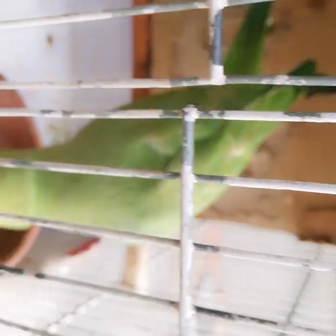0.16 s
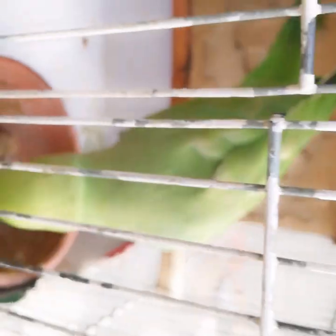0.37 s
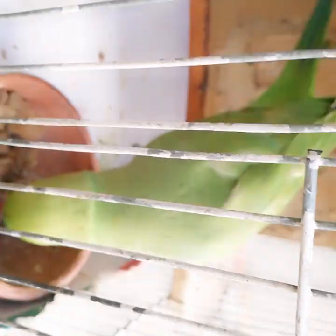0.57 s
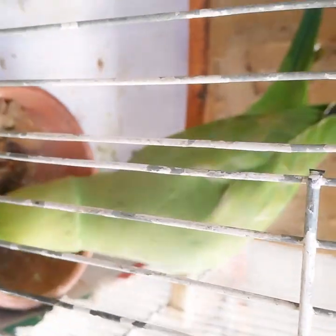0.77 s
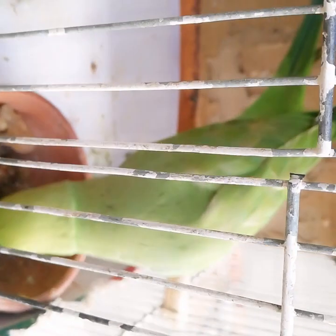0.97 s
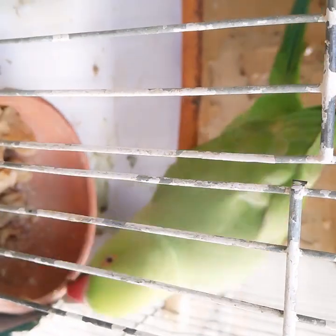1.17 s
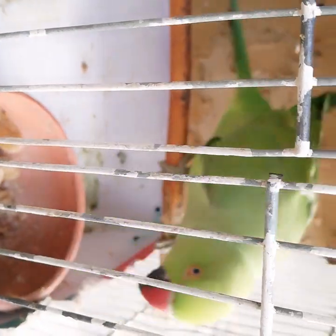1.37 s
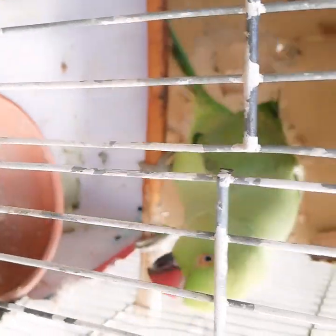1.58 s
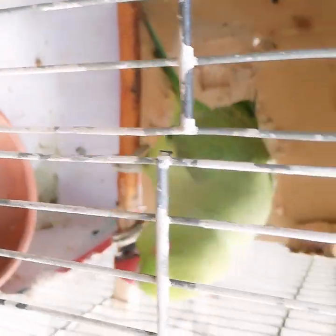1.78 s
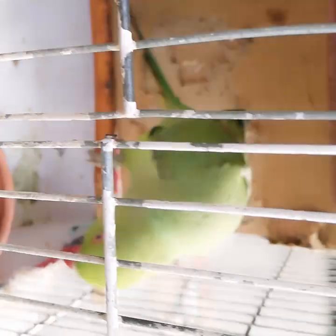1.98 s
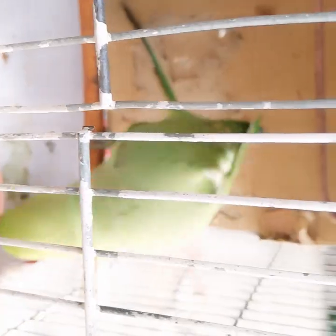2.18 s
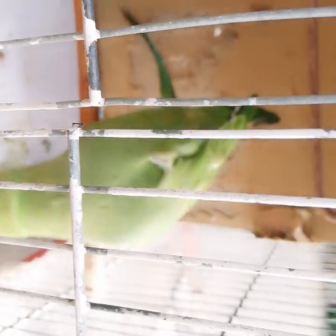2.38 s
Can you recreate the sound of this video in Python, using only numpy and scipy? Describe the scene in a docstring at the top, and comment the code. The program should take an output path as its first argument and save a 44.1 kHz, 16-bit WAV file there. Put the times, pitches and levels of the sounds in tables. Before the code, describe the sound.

Close to the microphone in a small room, a parrot gives two loud, hoarse squawks and a shorter, lower one, with a whistle dipping and rising. Thin chirps and two light cage ticks follow, ending in a quick upward whistle.

```python
"""Two loud parakeet squawks and a short lower one, close by, from a cage in a small room.
Each is a harmonic buzz of the syrinx: it starts hoarse, jumps into a clear nasal tone and breaks up
into a rasp of air puffs. A pure whistle swoops under the second squawk and returns at the end; thin,
breathy chirps and two ticks on the cage come in between. Faint rumble, hiss and soft bumps lie beneath."""
import sys
import numpy as np
from scipy import signal
from scipy.fft import rfft, irfft
from scipy.io import wavfile
from scipy.ndimage import uniform_filter1d

SR = 44100
rng = np.random.default_rng(int(sys.argv[2]) if len(sys.argv) > 2 else 0)


def unload_wav(signal):
    """Save mono or channel-first audio to the path in sys.argv[1] as 16-bit WAV at rate SR, clipped to [-1, 1]."""
    wavfile.write(
        sys.argv[1],
        SR,
        np.round(np.clip(np.atleast_2d(signal).T, -1, 1) * 32767).astype(np.int16),
    )


N = 108045

# background spectrum: freq_hz, gain_db
FLOOR_COLOUR = [(12, -32.5), (20, 0.5), (100, -0.5), (450, -12.5), (646, -11.5), (1100, -20), (1370, -16.5),
                (1760, -20.5), (2390, -18.5), (4160, -23.5), (4530, -20.5), (5810, -23.5), (10400, -13.5),
                (15400, -34)]
# background left-right likeness: freq_hz, correlation
FLOOR_COHERENCE = [(40, 0.38), (150, 0.99), (500, 0.39), (1500, 0.092), (15000, .05)]
# stereo tilt of background, reverb, direct sound: freq_hz, left_minus_right_db
FLOOR_BALANCE = [(60, 2), (400, 2), (2000, 5.5), (5000, 4), (9000, 18), (15000, 11)]
ROOM_BALANCE = [(200, -2.5), (700, 6), (1300, 5.5), (2400, 6), (5000, 7.5), (8500, 66.5), (12000, 19),
                (15000, 8)]
DIRECT_BALANCE = [(200, -6.5), (700, 5.5), (1300, 7), (2400, 15), (4400, 15), (6000, 2), (8300, 20),
                  (10000, 24), (12500, 17), (15000, -7)]
# direct sound's delay on the right: freq_hz, lag_rad
RIGHT_LAG = [(200, .1), (1200, 1.6), (2300, 2), (3200, 4.64), (5200, 6.26), (9700, 12.3), (15000, 6)]
# reverb decay: freq_hz, t60_s
ROOM_T60 = [(200, .4), (650, 0.4), (1400, 0.27), (4000, 0.28), (10000, 0.13), (15000, 0.098)]
# reverb spectrum: freq_hz, gain_db
ROOM_COLOUR = [(400, 2.5), (620, 1.5), (820, -4), (1600, 0), (4000, 3.5), (10000, 7), (15000, 3)]
# room resonance near 680 Hz that rings on and beats with squawks 1 and 2: time_s, pitch_hz, level_db
ROOM_RING = [
    [(.218, 699, -23), (.236, 685.4, -11.5), (.25, 663, -22.5), (.29, 687, -32)],
    [(.528, 683, -28.5), (.546, 660, -18), (.562, 709, -27), (.61, 686, -39.5)],
]

# low bumps: start_s, pitch_hz, level_db
BUMPS = [(0.064, 66.4, -47.5), (0.492, 75.3, -47.5), (2.185, 69.9, -50), (2.291, 70.6, -43)]
# claws and beak on the cage: start_s, level_db
TICKS = [(1.475, -35.5), (1.564, -36.5)]
# chirps: start_s, length_s, first_hz, middle_hz, last_hz, level_db, hiss_db
CHIRPS = [(-.02, 0.048, 4900, 4102, 2870, -40, -1.5), (0.114, 0.02, 8300, 9600, 9900, -54, 2.5),
          (0.756, 0.049, 3300, 3530, 4230, -41, 3), (.825, 0.06, 5350, 5074, 4236, -36, 1.5),
          (0.917, 0.059, 4113, 4480, 3863, -40, -0.5), (0.909, 0.036, 8400, 9580, 8700, -39, 2.5),
          (0.95, .04, 11400, 11800, 12900, -42, -4), (0.974, 0.04047, 8000, 9170, 9100, -42, 2.5),
          (0.998, 0.1, 4300, 4070, 4910, -47.5, 3.5), (1.09, 0.07, 4250, 4337, 3315, -40.5, 2),
          (1.113, 0.036, 3987, 3877, 3400, -34, -8), (1.72, 0.048, 6900, 6500, 7060, -47, -4),
          (1.721, 0.042, 4174, 4250, 4630, -58, -10), (1.752, 0.058, 4240, 4154, 4210, -49, 2.5),
          (1.804, 0.0487, 4130, 4500, 4400, -53, 4), (1.835, 0.045, 4300, 4710, 4794, -48.5, 1.5),
          (1.891, .04, 3523, 3764, 4270, -42, -13.5), (1.932, 0.02, 4440, 3700, 2880, -52, 1.5),
          (1.963, .036, 5630, 5980, 7340, -48, 4.5), (1.985, 0.063, 4490, 5346, 4550, -42.5, -6),
          (1.99, 0.046, 10930, 10070, 9700, -46, -7), (2.012, 0.053, 4000, 4280, 2500, -40, -5)]
# noise spectra of ticks and chirps: freq_hz, gain_db
TICK_COLOUR = [(300, -16), (1200, -4.5), (2500, -13.5), (5000, -12.5), (10000, -5.5), (15000, -24.5)]
CHIRP_HISS = [(1500, -38), (2800, -5.5), (4200, -1), (5200, 3.5), (6200, -9), (7600, -1.5), (9700, 2.5),
              (12000, -3.5), (15500, -24)]
# swoop, faint low peep, closing rise: time_s, pitch_hz, level_db
SWOOP = [(0.515, 1457, -40.5), (0.525, 1403, -36.5), (0.533, 1316, -23), (0.579, 1215, -29),
         (0.649, 1173, -33), (0.757, 1154, -39), (0.793, 1170, -35.5), (0.927, 1168, -35),
         (0.959, 1233, -27), (0.983, 1315, -20.5), (1.003, 1430, -15), (1.035, 1798, -28.5),
         (1.055, 1984, -27)]
PEEP = [(1.62, 766, -79), (1.645, 760, -54.5), (1.69, 690, -66)]
UPSWEEP = [(2.345, 1243, -68.5), (2.365, 1283, -50), (2.385, 1430, -31), (2.401, 1562, -33.5),
           (2.421, 1810, -29.5), (2.432, 1905, -87)]

# squawk curves: time_s, pitch_hz, fundamental_db, octave_db, fourth_db, upper_db
FIRST = [(0.18, 621, -40.5, -33.5, -53, -39), (0.188, 642.5, -34, -29.5, -52, -44),
         (0.206, 658.5, -18.5, -20.5, -39, -35.5), (0.218, 662.4, -20, -23, -42, -27),
         (0.23, 802.8, -20, -20.5, -41, -35.5), (0.248, 806.3, -20.5, -17, -46, -35),
         (0.278, 797, -14.5, -17.5, -47, -36.5), (0.298, 807.5, -28.5, -26, -47, -36.5),
         (0.31, 794, -12, -21, -47, -43), (0.322, 785.6, -12, -13.5, -35.5, -30.5),
         (0.34, 774.6, -14, -32.5, -43.5, -34.5), (0.354, 784, -18.5, -19, -44, -42),
         (0.385, 779, -32, -31.5, -52.5, -41.5)]
SECOND = [(0.508, 725, -23.5, -28.5, -44, -50), (0.52, 715, -24, -32, -41, -39.5),
          (0.528, 701, -21.5, -20.5, -42.5, -29.5), (0.538, 829.4, -11, -23, -33, -34),
          (0.56, 862.5, -17, -23.5, -42.5, -34), (0.594, 840, -12.5, -21, -43, -30),
          (0.606, 813.4, -14, -19.5, -30.5, -39.5), (0.628, 803.7, -13, -20, -24.5, -36),
          (0.658, 813.2, -11.5, -20.5, -31.5, -34.5), (0.686, 835.2, -10.5, -16.5, -33, -36),
          (0.704, 839.4, -15, -22, -42, -36.5), (0.72, 854.8, -9, -22.5, -42.5, -30.5),
          (0.738, 847, -19, -18.5, -42.5, -30), (0.756, 843.6, -11.5, -16, -45.5, -35.5),
          (0.77, 841, -10, -18.5, -39.5, -38), (0.804, 812.2, -11.5, -20, -31.5, -36),
          (0.814, 828, -11.5, -21, -42.5, -31), (0.83, 805.2, -18.5, -25.5, -25, -39.5),
          (0.846, 849.4, -20.5, -31, -47, -38.5), (0.864, 797.2, -19.5, -28, -53, -39.5),
          (0.914, 611, -26, -26, -45.5, -46.5), (0.94, 595.6, -21.5, -30, -48, -58)]
THIRD = [(1.065, 549, -43.5, -28, -58, -38), (1.079, 554, -28, -30, -48.5, -40.5),
         (1.093, 622.3, -32, -28.5, -48, -45.5), (1.123, 649, -19, -17.5, -59, -29.5),
         (1.137, 636, -20.5, -25, -53.5, -32), (1.161, 602.4, -23, -45, -40, -29),
         (1.173, 625, -31.5, -40.5, -68, -35.5), (1.19, 632, -24, -38.5, -61, -27.5)]
# squawk voicing: curve, breath_db, hollow_depth, top_hz
SQUAWKS = [(FIRST, 0, 0.31, 13000), (SECOND, 0, 0.91, 15500), (THIRD, -10.5, .1, 13500)]
# hoarseness, 0 is clear: time_s, roughness
HOARSENESS = [(.18, 1), (.2, 0.21), (.226, 0.05), (.25, 0), (.34, 0), (.362, 0.92), (.39, 1.06),
              (.515, 0.74), (.545, 0.04), (.6, 0.02), (.79, 0.01), (.82, 0.25), (.87, 0.83), (.94, 1),
              (1.08, 0.64), (1.11, 0.12), (1.14, 0.11), (1.175, 0.83)]
# spectra of upper harmonics, rasp, breath: freq_hz, gain_db
UPPER_COLOUR = [(1900, 3.5), (2450, 4.5), (3000, -11.5), (3800, -6), (4400, -14.5), (5000, -7.5),
                (5800, -7), (6500, -5.5), (7400, -14.5), (8500, -6.5), (9700, -2.5), (11000, -8.5),
                (13000, -10), (15500, -22.5)]
RASP_COLOUR = [(150, -71), (340, -41), (420, -28.5), (500, -12), (700, 3), (880, -1.5), (1350, -9.5),
               (1800, -2.5), (2200, -15), (3000, -26.5), (3700, -44.5), (15000, -59)]
BREATH_COLOUR = [(1500, -32.5), (2300, 2), (2850, -10), (3250, 1.5), (3700, -9), (4400, -2), (5000, 3),
                 (6000, 5), (7200, -8), (9600, 6.5), (12000, -10), (15500, -17.5)]
# two throat antiresonances and a peak, at full depth: centre_hz, width_hz, gain_db
HOLLOWS = [(3625, 242, -18.5), (4280, 200, -0.5), (3110, 109, 10.5)]

CUTOFF_HZ, FLOOR_DB, ROOM_GAP_S = 15600, -55.5, 0.0079
VOICE_SEND_DB, TICK_SEND_DB, WHISTLE_SEND_DB, CHIRP_SEND_DB = -10, -30, -17.5, -8
BUMP_S, TICK_DECAY_S, EDGE_S = 0.02, 0.0023, 0.0033
CHIRP_WAVER, CHIRP_WAVER_HZ, CHIRP_OCTAVE_DB, HISS_TRIM_DB = 0.016, 397.7, -17.5, -0.5
WHISTLE_GAIN_DB, WHISTLE_OCTAVE_DB, WHISTLE_AIR_DB = 1.5, -42, -32.5
JITTER, JITTER_ROUGH, JITTER_HZ, SHIMMER = 0.0028, 0.054, 248, 0.19
FLUTTER_DB, FLUTTER_HZ, RAGGED_RAD_PER_KHZ, RAGGED_HZ = 5.5, 23.7, 0.1, 110
BREATH_GAIN_DB, BREATH_FLOOR, LEAP_HZ_PER_S = 2, 0.098, 8000
BINS_HZ = np.fft.rfftfreq(N, 1 / SR)


def amp(db):
    """Decibels to gain."""
    return 10 ** (np.asarray(db) / 20)


def unit(x):
    """Scale to rms 1."""
    return x / np.sqrt(np.mean(np.abs(x) ** 2) + 1e-20)


def read(points, hz):
    """Interpolate on a log-frequency axis."""
    freq_hz, value = np.transpose(points)
    return np.interp(np.log(hz + 1), np.log(freq_hz + 1), value)


def add(mix, start_s, sound):
    """Mix in a sound, cropped to fit."""
    at = round(start_s * SR)
    part = mix[max(at, 0):][:len(sound) + min(at, 0)]
    part += sound[max(-at, 0):][:len(part)]


def colour(x, points):
    """Filter by a dB spectrum."""
    return irfft(rfft(x) * amp(read(points, np.fft.rfftfreq(len(x), 1 / SR))), len(x))


def noise(n):
    """White noise."""
    return rng.standard_normal(N)[:n]


def wander(n, rate_hz):
    """Random motion up to a rate, rms about 1."""
    hz = np.fft.rfftfreq(SR, 1 / SR)
    return unit(irfft(rfft(rng.standard_normal(SR)) / (1 + (hz / rate_hz) ** 4), SR))[:n]


def controls(curve):
    """Time, a soft gate and each column at the sample rate."""
    time_s, *columns = np.transpose(curve)
    t = np.arange(time_s[0], time_s[-1], 1 / SR)
    gate = np.clip(np.minimum(t - t[0], t[-1] - t) / EDGE_S, 0, 1)
    return t, gate, *[np.interp(t, time_s, column) for column in columns]


def lean(pair, balance):
    """Tilt left against right, band by band."""
    right = amp(-read(balance, BINS_HZ))
    return irfft(rfft(pair) * np.array([np.ones_like(right), right]) * 2 / (1 + right), N)


def floor():
    """Low room rumble and faint high hiss."""
    coherence = read(FLOOR_COHERENCE, BINS_HZ)
    left, other = colour(noise(N), FLOOR_COLOUR), colour(noise(N), FLOOR_COLOUR)
    right = irfft(coherence * rfft(left) + np.sqrt(1 - coherence ** 2) * rfft(other), N)
    pair = lean(np.array([left, right]), FLOOR_BALANCE)
    return amp(FLOOR_DB) * pair / pair.mean(0).std()


def room(x):
    """Dense small-room reflections, each band dying at its own rate."""
    hz, t, bands = signal.stft(rng.standard_normal((2, SR)), SR, nperseg=256)
    decay = amp(-60 * t / read(ROOM_T60, hz)[:, None])
    tail = signal.istft(bands * decay, SR, nperseg=256)[1]
    tail *= np.clip(np.arange(tail.shape[1]) / SR / ROOM_GAP_S - 1, 0, 1)
    tail /= np.linalg.norm(tail[0])
    echoes = signal.fftconvolve(colour(x, ROOM_COLOUR)[None], tail, axes=1)[:, :N]
    return lean(echoes, ROOM_BALANCE)


def direct(x):
    """The bird is nearer the left; the right gets it later and shaded."""
    late = irfft(rfft(x) * np.exp(-1j * read(RIGHT_LAG, BINS_HZ)), N)
    return lean(np.array([x, late]), DIRECT_BALANCE)


def bump(start_s, pitch_hz, level_db):
    """One soft low push."""
    t = np.arange(0, BUMP_S, 1 / SR)
    return start_s, amp(level_db) * np.sin(np.pi * t / BUMP_S) * np.sin(2 * np.pi * pitch_hz * t)


def tick(start_s, level_db):
    """Claw or beak hits the cage: a noise burst, no ring."""
    t = np.arange(1024) / SR
    return start_s, amp(level_db) * unit(colour(noise(len(t)), TICK_COLOUR)) * np.exp(-t / TICK_DECAY_S)


def chirp(start_s, length_s, first_hz, middle_hz, last_hz, level_db, hiss_db):
    """Thin unsteady whistle on a pitch parabola, with its octave and a hiss of air."""
    n = round(length_s * SR)
    progress = np.linspace(0, 1, n)
    pitch_hz = np.polyval(np.polyfit([0, .5, 1], [first_hz, middle_hz, last_hz], 2), progress)
    phase = 2 * np.pi * np.cumsum(pitch_hz * (1 + CHIRP_WAVER * wander(n, CHIRP_WAVER_HZ))) / SR
    octave = amp(CHIRP_OCTAVE_DB) * (2 * pitch_hz < CUTOFF_HZ) * np.sin(2 * phase)
    tone = unit((np.sin(phase) + octave) * (1 + .45 * wander(n, CHIRP_WAVER_HZ)))
    hiss = unit(colour(noise(n), CHIRP_HISS) * (1 + .4 * wander(n, CHIRP_WAVER_HZ)))
    envelope = amp(level_db) * np.abs(np.sin(np.pi * progress)) ** 0.51
    return start_s, envelope * (tone + amp(hiss_db + HISS_TRIM_DB) * hiss)


def whistle(curve):
    """Near-pure gliding tone with a trace of air; also plays the room ring."""
    t, gate, pitch_hz, level_db = controls(curve)
    phase = 2 * np.pi * np.cumsum(uniform_filter1d(pitch_hz, size=400, mode="nearest")) / SR
    tone = np.sin(phase) + amp(WHISTLE_OCTAVE_DB) * np.sin(2 * phase)
    air = amp(WHISTLE_AIR_DB) * unit(colour(noise(len(t)), BREATH_COLOUR))
    return t[0], gate * np.sqrt(2) * amp(level_db + WHISTLE_GAIN_DB) * (tone + air)


def register_breaks(pitch_hz):
    """The voice snaps between registers in place of very fast slides."""
    index = np.arange(len(pitch_hz))
    steady = index[np.abs(np.gradient(pitch_hz)) * SR < LEAP_HZ_PER_S]
    nearest = np.rint(np.interp(index, steady, np.arange(len(steady)))).astype(int)
    return pitch_hz[steady[nearest]]


def throat(x, depth, top_hz):
    """Cut the nasal hollows and roll off the treble."""
    shape_db = sum(db * np.exp(-((BINS_HZ - hz) / width_hz) ** 2) for hz, width_hz, db in HOLLOWS)
    return irfft(rfft(x, N) * amp(depth * shape_db) / np.sqrt(1 + (BINS_HZ / top_hz) ** 20), N)[:len(x)]


def upper_harmonics(pitch_hz, phase):
    """Harmonics 3 and 5-24, each fluttering in level and phase."""
    n = len(phase)
    k = np.r_[3, 5:25][:, None]
    hz = k * pitch_hz
    flutter_db = FLUTTER_DB * np.array([wander(n, FLUTTER_HZ) for _ in k])
    ragged_rad = RAGGED_RAD_PER_KHZ * hz / 1000 * np.array([wander(n, RAGGED_HZ) for _ in k])
    weights = amp(read(UPPER_COLOUR, hz) + flutter_db) * (hz < CUTOFF_HZ)
    partials = weights * np.cos(k * phase + k ** 2 + ragged_rad)
    return partials.sum(0) / np.sqrt((weights[1:] ** 2).sum(0))


def squawk(curve, breath_db, hollow_depth, top_hz):
    """The syrinx buzzes; as it turns hoarse its cycles grow uneven and puffs of air take over."""
    t, gate, pitch_hz, fundamental_db, octave_db, fourth_db, upper_db = controls(curve)
    n = len(t)
    pitch_hz = register_breaks(pitch_hz)
    rough = np.clip(np.interp(t, *np.transpose(HOARSENESS)), 0, .98)
    jitter = (JITTER + JITTER_ROUGH * rough ** 2) * wander(n, JITTER_HZ)
    phase = 2 * np.pi * np.cumsum(pitch_hz * (1 + jitter)) / SR
    buzz = amp(fundamental_db) * np.cos(phase) - amp(octave_db) * np.cos(2 * phase)
    buzz += amp(fourth_db) * np.sin(4 * phase) + amp(upper_db) * upper_harmonics(pitch_hz, phase)
    shimmer = 1 + SHIMMER * rough * wander(n, JITTER_HZ)
    tone = np.sqrt(2 * (1 - rough ** 2)) * buzz * shimmer
    puffs = 1 + np.cos(phase)  # one per cycle
    rasp = unit(colour(puffs * noise(n), RASP_COLOUR))
    rasp *= rough * np.hypot(amp(fundamental_db), amp(octave_db))
    air = unit(colour(puffs * noise(n), BREATH_COLOUR))
    air *= np.hypot(rough, BREATH_FLOOR) * amp(upper_db + BREATH_GAIN_DB + breath_db)
    return t[0], gate * throat(tone + rasp + air, hollow_depth, top_hz)


def scene():
    """Bird, cage and room in stereo."""
    voice, tones, chirps, ticks, bumps = np.zeros((5, N))
    for row in SQUAWKS:
        add(voice, *squawk(*row))
    for curve in (SWOOP, PEEP, UPSWEEP, *ROOM_RING):
        add(tones, *whistle(curve))
    for row in CHIRPS:
        add(chirps, *chirp(*row))
    for row in TICKS:
        add(ticks, *tick(*row))
    for row in BUMPS:
        add(bumps, *bump(*row))
    send = (amp(VOICE_SEND_DB) * voice + amp(TICK_SEND_DB) * ticks
            + amp(WHISTLE_SEND_DB) * tones + amp(CHIRP_SEND_DB) * chirps)
    return direct(voice + tones + chirps + ticks) + room(send) + bumps + floor()


def record(dry):
    """Clip at full scale, then low-pass."""
    lowpass = signal.firwin(511, CUTOFF_HZ, window=("kaiser", 9), fs=SR)
    return signal.oaconvolve(np.clip(dry, -1, 1), lowpass[None], "same")


dry = scene()
out = record(dry)
unload_wav(out)
```